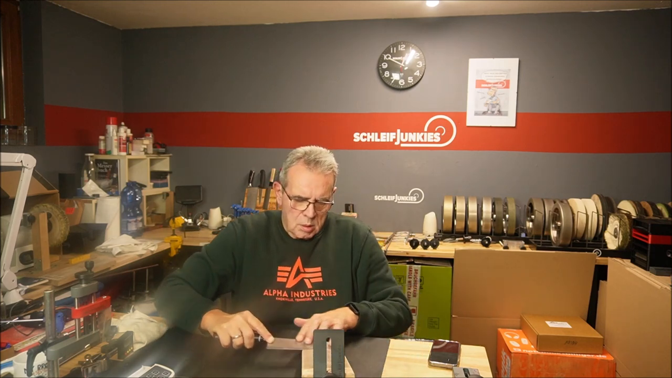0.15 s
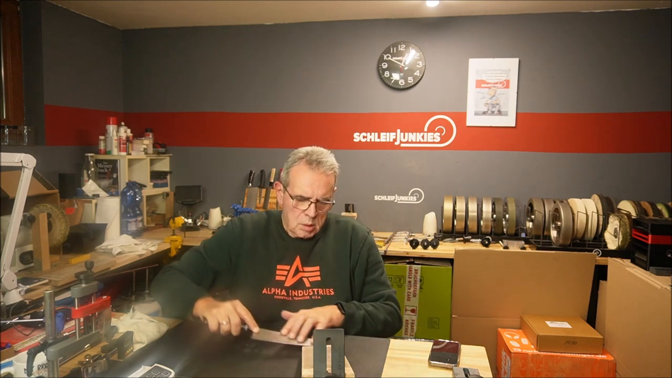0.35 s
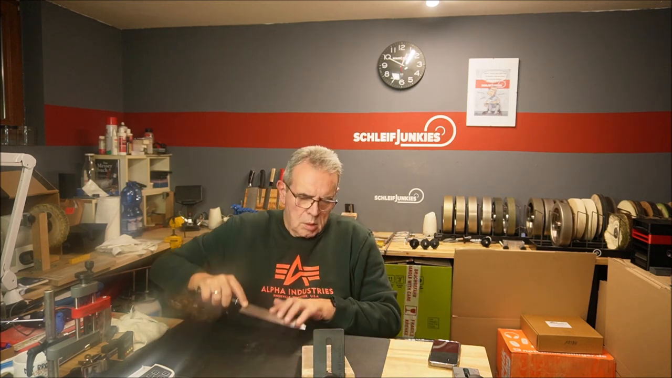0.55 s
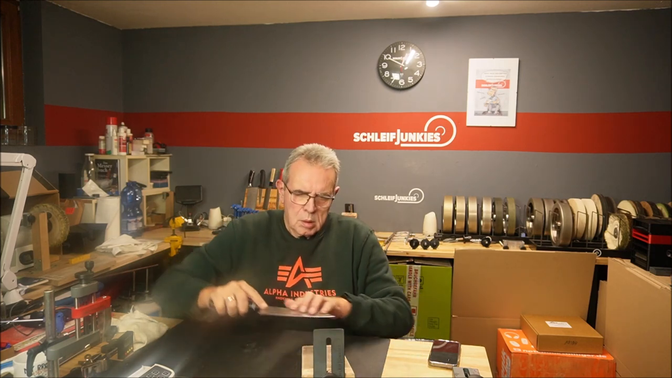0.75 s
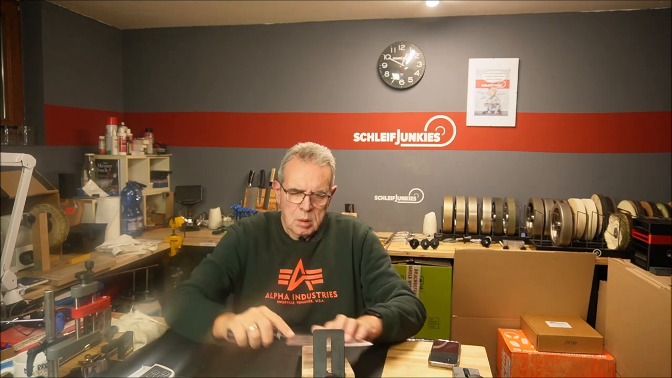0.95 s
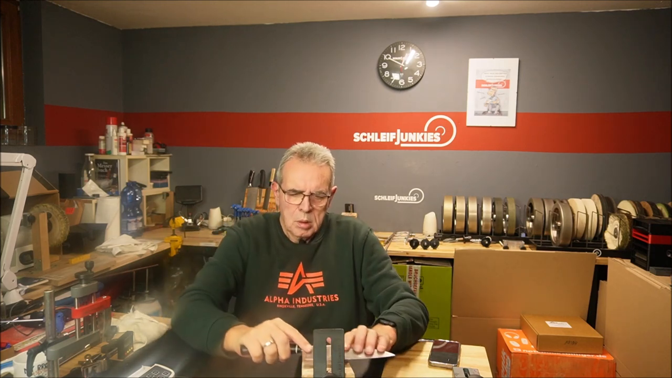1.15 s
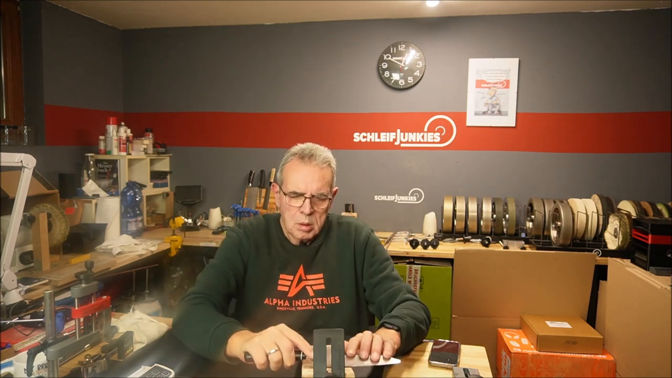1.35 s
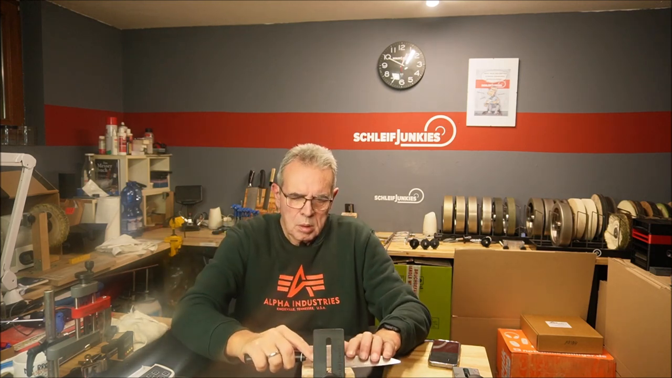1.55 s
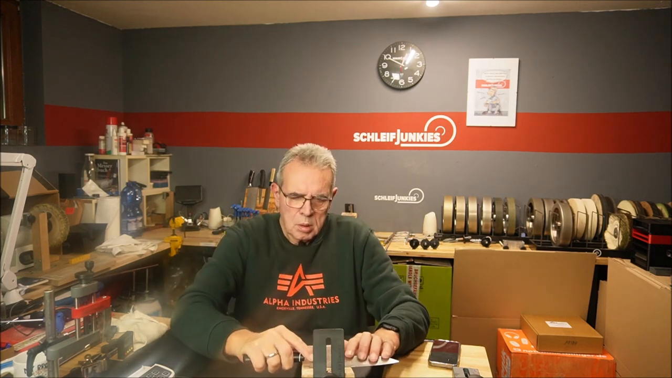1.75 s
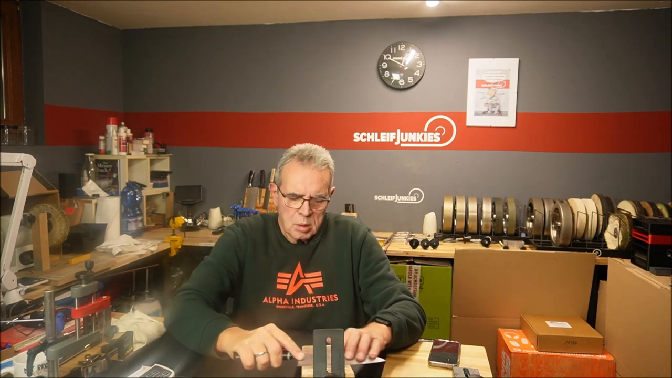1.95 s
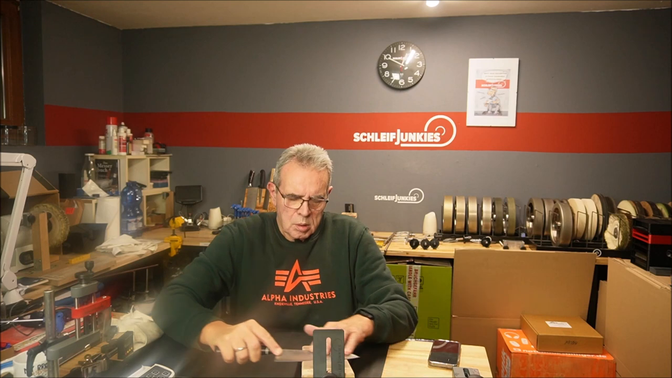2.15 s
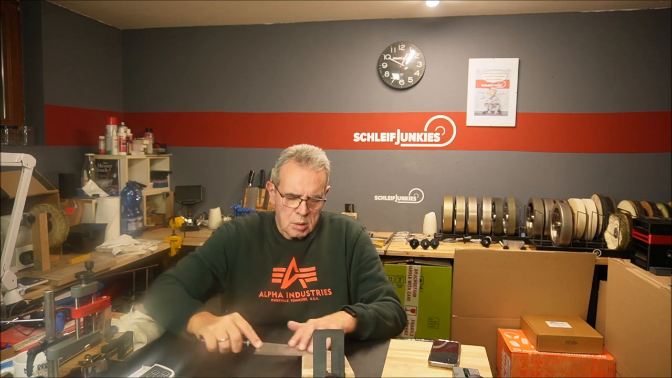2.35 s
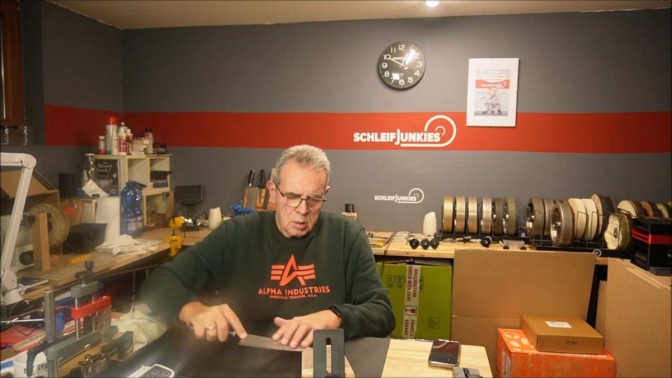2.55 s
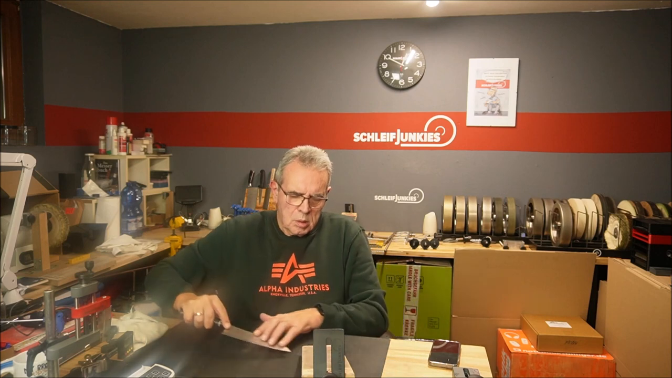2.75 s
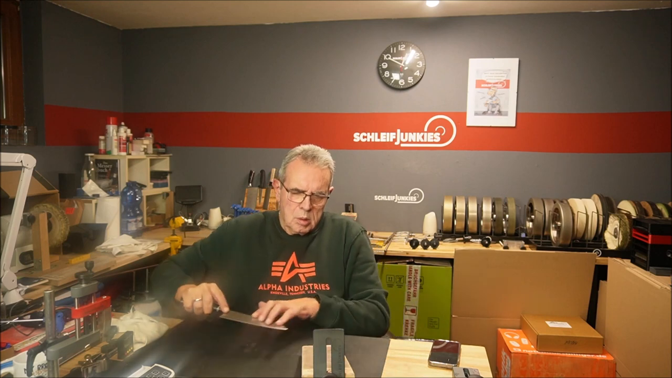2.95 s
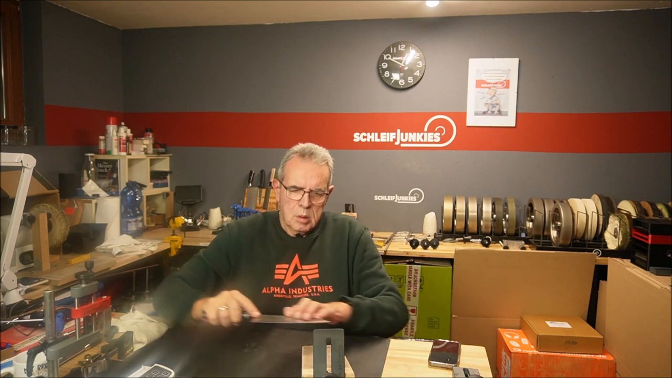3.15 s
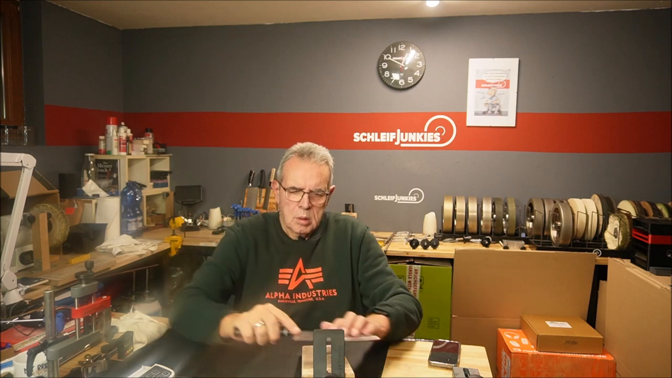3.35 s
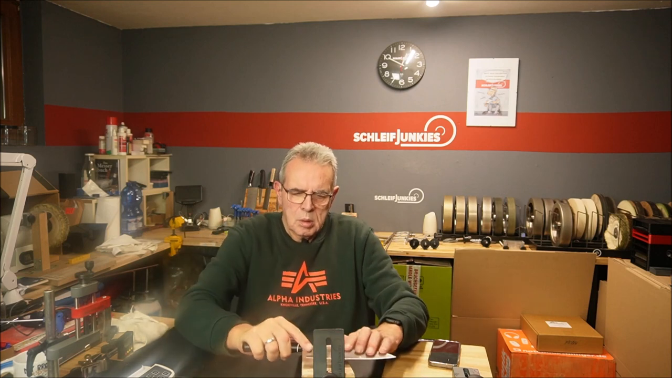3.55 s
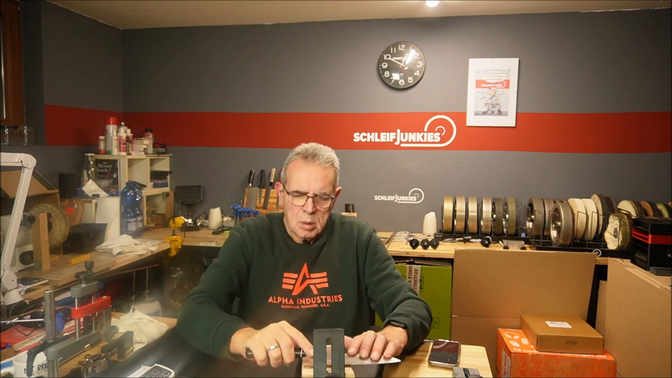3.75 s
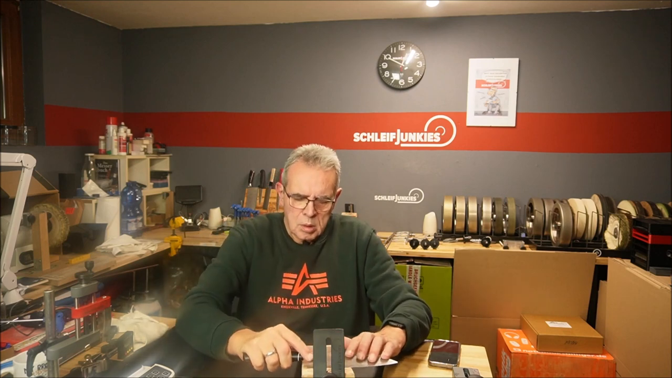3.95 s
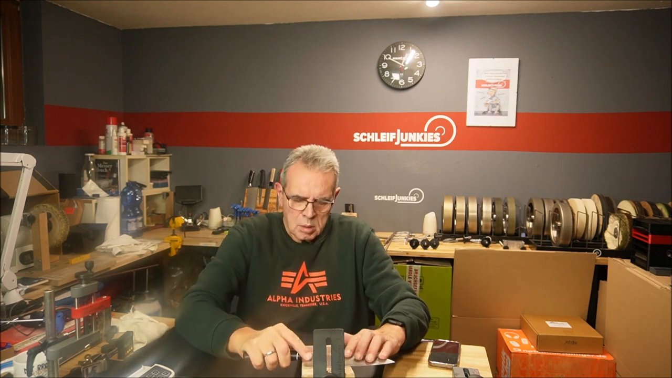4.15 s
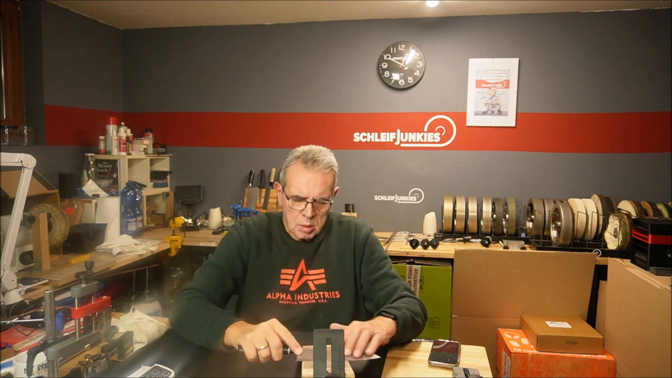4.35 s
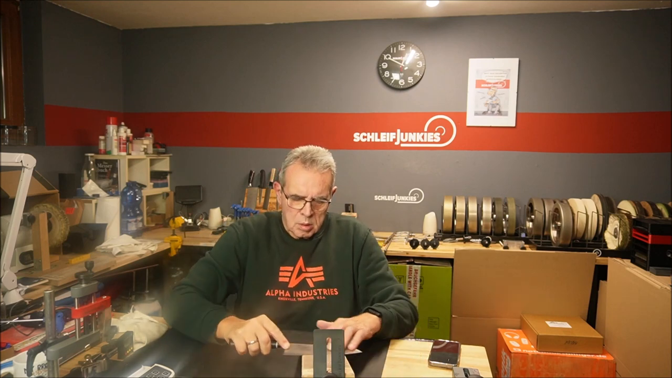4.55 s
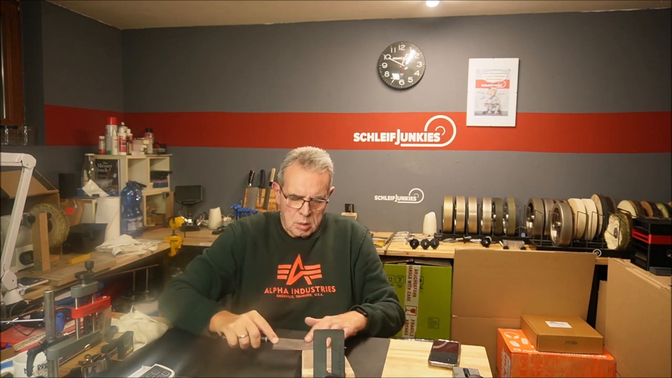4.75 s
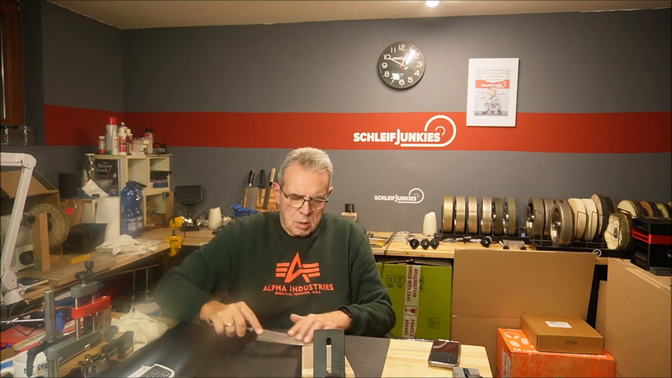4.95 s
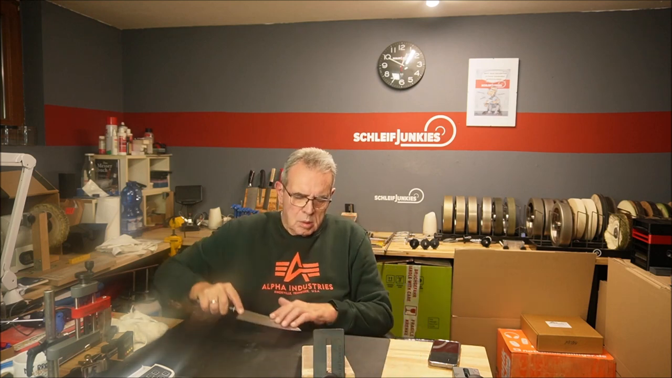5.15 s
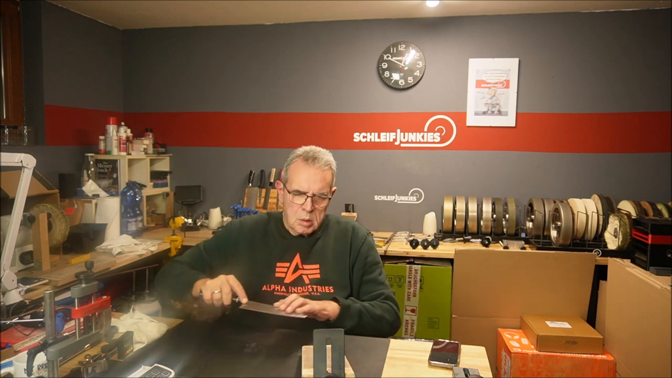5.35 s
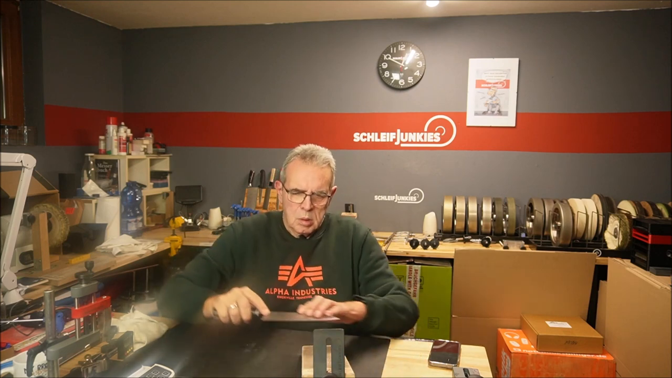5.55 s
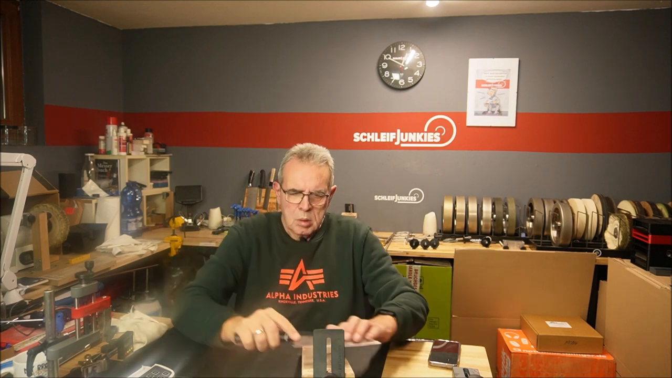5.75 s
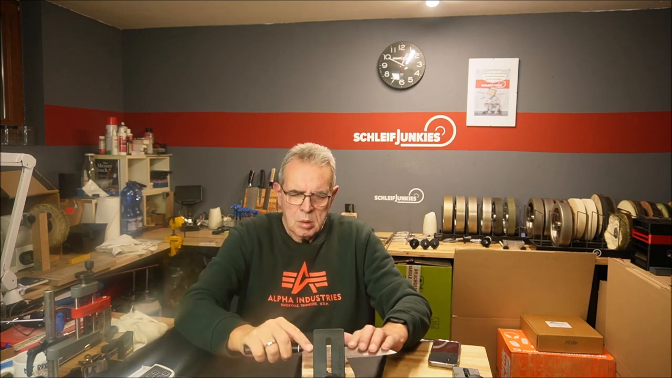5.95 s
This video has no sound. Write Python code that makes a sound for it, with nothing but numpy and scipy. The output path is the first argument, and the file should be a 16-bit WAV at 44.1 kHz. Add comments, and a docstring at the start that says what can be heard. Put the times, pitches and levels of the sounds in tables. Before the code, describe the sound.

A knife blade strops across leather in long ringing, hissing scrapes, with soft knocks as it lands, close up in a small quiet workshop.

```python
"""Knife on a leather strop

A knife is stropped on leather on a workbench, close to a stereo microphone in a small workshop.
Stick-slip friction, made of noise, drives resonances that glide as the contact goes from heel to tip:
one free length of steel shortens and the other grows, so the modes rise, fall and cross.
Decaying bench modes give soft knocks as the blade lands or leaves; short noise bursts give dry ticks.
Shaped noise gives the rustling sleeves and room tone, and a decaying noise tail gives the room."""
import sys
import numpy as np
from scipy import signal
from scipy.fft import rfft, irfft, next_fast_len
from scipy.io import wavfile
from scipy.ndimage import uniform_filter1d, map_coordinates

SR = 44100
rng = np.random.default_rng(int(sys.argv[2]) if len(sys.argv) > 2 else 0)


def int16_out(signal):
    """Quantize to a 16-bit WAV file."""
    q = np.round(np.clip(np.atleast_2d(signal).T, -1, 1) * 32767)
    wavfile.write(sys.argv[1], SR, q.astype(np.int16))


N = 269010  # length in samples


def amp(db):
    """Decibel law: 20 dB is a tenfold gain in amplitude."""
    return 10 ** (np.asarray(db) / 20)


def unit(x):
    """Normalisation: scale to a root-mean-square of 1."""
    return x / np.sqrt(np.mean(x ** 2) + 1e-20)


def along(points, hz):
    """Logarithmic frequency scale: read (Hz, value) points between their knots."""
    f, v = np.transpose(points)
    return np.interp(np.log(hz + 1), np.log(f + 1), v)


def follow(rows, where):
    """Linear interpolation: read each later column of a table along its first."""
    first, *columns = np.transpose(rows)
    return [np.interp(where, first, column) for column in columns]


def wobble(rate):
    """Band-limited random fluctuation: a smooth curve with rate knots a second, at rms 1."""
    knots = rng.standard_normal(4096)
    return unit(map_coordinates(knots, [np.arange(N) * rate / SR], order=2, mode="wrap"))


def swell(t, centre_s, half_s):
    """Gaussian envelope: a bell-shaped rise and fall of height 1."""
    return np.exp(-((t - centre_s) / half_s) ** 2)


def filtered(x, response):
    """Linear filtering: multiply the spectrum by a response of frequency."""
    n = x.shape[-1]
    padded = next_fast_len(n + 4096, True)
    hz = np.fft.rfftfreq(padded, 1 / SR)
    return irfft(rfft(x, padded) * response(hz), padded)[..., :n]


def coloured(x, spectrum):
    """Spectral shaping: give x a (Hz, dB) colour, at rms 1."""
    return unit(filtered(x, lambda hz: amp(along(spectrum, hz))))


def even(x):
    """Envelope levelling: hold the slow level at 1 and keep the fast flutter."""
    power = np.abs(uniform_filter1d(x ** 2, size=2600))
    return x / np.sqrt(power + 1e-12)


def stereo(pair, width):
    """Mid-side stereophony: the side is added on the left and subtracted on the right."""
    mid = pair[0]
    side = filtered(pair[1], lambda hz: amp(along(width, hz)))
    return np.array([mid + side, mid - side])


# contact positions (heel 0, point 1): the curve of the edge, and the furthest that a stroke reaches
BELLY, TIP = 0.57, 0.975
PULL_S = 0.06  # how quickly the hand pulls through the belly
ROLL_BACK = 0.55  # past the furthest point the contact rocks back, at this share of its speed


def contact(t, belly_s, speed, pull):
    """Kinematics: heel-to-tip travel, quicker through the belly, then a slight rock back at the tip."""
    travel = BELLY + speed * (t - belly_s) + pull * np.tanh((t - belly_s) / PULL_S)
    travel = np.maximum(travel, 0)
    return np.minimum(travel, TIP - ROLL_BACK * (travel - TIP))


# How the blade answers from heel to tip. Each row: contact position from 0 to 1,
# then deep ring, bright ring and hiss, all in dB.
RESPONSE = [(.1, -8.7, -1, -16), (.3, -11.4, -.2, -9.5), (.47, -7.3, -1.2, -12), (.6, -5, -3.9, -13),
            (.74, -8, -10.2, -16.5), (.88, -15, -14.8, -25)]
# The edge bites into the leather for a moment, or eases off. Each row: centre in seconds,
# half-width in seconds, then the change of deep ring, bright ring and hiss in dB.
BITES = [(.145, .025, -1, 5.5, -2), (2.2, .032, -2, 4, 3.5), (2.35, .046, 2.5, 11.5, 2),
         (2.574, .056, -5, -4, 1), (4.485, .023, 0, 4, 0), (4.615, .028, 7.5, -1.5, -1),
         (4.737, .035, 7, -3.5, 3), (4.82, .024, 6.5, 6.5, 1), (5.008, .012, -2, 2, 7)]
ATTACK_S, EASE_S = 0.2, 0.034  # S-curve of pressure: time to half strength, and time constant
PRESS_LEAD_S, PRESS_S = 0.026, 0.05  # last press on the tip: lead on the lift-off, and half-width
RELEASE_DB_PER_S = 1500  # the blade leaves the leather


def stroke_levels(t, position, start_s, lift_s, tip_deep_db, tip_bright_db):
    """Contact pressure sets deep ring, bright ring and hiss: it builds, bites, presses the tip, lets go."""
    attack_db = -20 * np.log10(1 + np.exp((start_s + ATTACK_S - t) / EASE_S))
    release_db = -RELEASE_DB_PER_S * np.maximum(t - lift_s, 0)
    last_press = (lift_s - PRESS_LEAD_S, PRESS_S, tip_deep_db, tip_bright_db, 0)
    bites_db = sum(np.outer(gains_db, swell(t, centre_s, half_s))
                   for centre_s, half_s, *gains_db in [*BITES, last_press])
    return np.array(follow(RESPONSE, position)) + attack_db + bites_db + release_db


def tip_echo(x, position, strength):
    """Comb filtering: waves return from the blade's far end, later as the contact travels."""
    delay_s = 0.00064 + 0.00067 * position
    echo = np.array([map_coordinates(channel, [np.arange(len(channel)) - delay_s * SR]) for channel in x])
    return unit(x + strength * echo)


def ring(friction, modes, position, tilt_db, width_hz):
    """Forced resonance: friction excites modes that glide with the contact; width_hz holds at 1 kHz."""
    out = 0
    for mode in modes:
        hz, db = follow(mode, position)
        width = width_hz * np.sqrt(hz.mean() / 1000)  # the leather damps higher modes more
        # shift the gliding mode down to 0 Hz, filter it there, and shift it back
        turn = np.exp(2j * np.pi * np.cumsum(hz) / SR)
        swing = signal.sosfilt(signal.butter(1, width / 2, fs=SR, output="sos"), friction / turn)
        swing = signal.sosfilt(signal.butter(1, width * 2, fs=SR, output="sos"), swing)
        octaves = np.log2(np.clip(hz, 1100, 3600) / 2500)
        out = out + amp(db + tilt_db * octaves) * unit((swing * turn).real)
    return out


# The strokes, with one faint brush as the blade is settled. Each row: start in seconds,
# lift-off in seconds, level in dB, extra lean toward the tip in dB, deep ring in dB, hiss in dB,
# deep and bright gain of the last press in dB, tilt of the modes at start and at lift-off in dB per octave,
# moment the belly passes in seconds, speed in blade lengths per second,
# and extra pull to either side of the belly in blade lengths.
STROKES = [ (-0.55, 0.37, -32, -1.1, 1.6, 1.2, 7, 7, -44, 12, -0.005, .88, .09),
           (1.33, 1.615, -61.5, 0, -8, 0, 0, 0, -6, -4, 1.92, .9, 0),
           (1.666, 2.656, -33, 2.6, 0.2, 1.4, -4, 4.4, -6, 8, 2.192, .78, .155),
           (3.978, 5.006, -30.2, -1.3, 0, 0.4, 9.8, 7.3, 3, -1, 4.618, 1.11, .003), ]
# Bending modes of the blade, one list of points per mode. Each point: contact position from 0 to 1,
# frequency in Hz, level in dB.
BLADE = [
    [(0, 716, -1), (.2, 860, 1.5), (.45, 1024, -22.5), (.6, 1356, 4), (.7, 1804, 8.5), (.76, 2114, 2),
     (.81, 2546, 7.5), (.88, 2680, -21)],
    [(0, 1590, -65), (.3, 1620, -19.5), (.45, 1370, -9), (.58, 1296, 14.5), (.68, 1136, 1), (.8, 937, -4.5),
     (.9, 740, -10), (1, 774, -8)],
    [(0, 2650, -4.5), (.18, 2677, 5.5), (.42, 2870, 3.5), (.55, 2330, -6.5), (.68, 2310, -6),
     (.75, 1840, 5), (.85, 1653, -7.5), (.94, 1217, 3.5), (1, 1250, 10)],
    [(0, 1750, 5), (.17, 1800, 7), (.28, 2030, -3), (.36, 2490, -2.5), (.43, 3030, 10.5), (.48, 2970, 2.5),
     (.56, 3430, -1), (.66, 3576, -10.5), (.83, 3520, -4), (.9, 3560, -5)],
    [(0, 3000, -16), (.2, 3177, 7), (.35, 3230, 3.5), (.5, 3500, -1.5), (.6, 3360, 0), (.74, 3220, -6),
     (.84, 3290, 6), (.9, 3150, -10.5), (1, 3030, -3)],
    [(0, 3430, -29), (.25, 3520, 3), (.45, 3910, -11.5), (.7, 4140, -10), (.88, 3970, -5), (.97, 3260, -10),
     (1, 3530, 3)],
    [(0, 2350, -8), (.25, 2330, 6), (.5, 2250, -30.5), (.88, 2650, -10.5), (.96, 2550, 2), (1, 2550, 8)],
    [(.55, 3030, -41), (.8, 2520, -4), (.89, 2430, -3.5), (.94, 1840, 2), (1, 2050, 3)],
    [(.75, 4030, -46), (.85, 4400, -10), (.9, 4520, -8.5), (.94, 4500, -12), (1, 4380, -17)],
]
# High, crowded modes of the edge, one list of points per mode. Each point: contact position from 0 to 1,
# frequency in Hz, level in dB.
EDGE = [
    [(0, 6270, 1), (.3, 6850, -3.5), (.55, 7300, -3), (.75, 7560, -2), (.9, 6080, -8.5), (1, 5700, -13)],
    [(0, 7300, -1), (.35, 7700, -3.5), (.55, 7800, -1), (.7, 7000, -4), (.85, 8300, 7.5), (1, 8150, -25)],
    [(0, 7600, -9), (.35, 8200, 0), (.55, 8400, -11), (.75, 8730, 6.5), (.88, 9260, -10), (1, 9200, -6)],
    [(0, 10000, -21), (.5, 9400, -8), (.8, 10300, -6), (1, 11000, -19)],
]
# Rub between the modes. Each row: frequency in Hz, level in dB.
SCRAPE = [(150, -60), (450, -12), (700, -10), (1050, -13), (1400, -4.5), (2150, -11.5), (3100, -7),
          (3900, -8), (5200, -29), (6500, -49)]
# Hiss of the leather fibres. Each row: frequency in Hz, level in dB.
HISS = [(600, -70), (3500, -24), (5000, -35), (5800, -19), (6800, 8.5), (8000, 9), (10000, -4),
        (11200, -8.5), (12500, -21), (14500, -15), (15700, -32)]
# Rumble of the rubbed strop. Each row: frequency in Hz, level in dB.
STROP = [(30, -36), (70, -14), (130, -15.5), (280, -7), (385, 4.8), (500, -7), (650, -3.5), (800, -1.5),
         (1100, -27)]
# Fizz of the finest fibres. Each row: frequency in Hz, level in dB.
FIZZ = [(5000, -27), (9500, 3), (11500, 0), (12800, -10), (15000, -2.5)]
FIZZ_LEAN = 0.9  # leaning on the tip tears more fine fibres: dB of fizz per dB of lean
PATCH_DB, PATCH_RATE = 0.6, 24  # uneven nap of the leather: depth in the hiss, and knots per second


def strokes():
    """Stick-slip friction: catching fibres ring the blade, hiss, and rumble in the strop."""
    out = np.zeros((2, N))
    grip = amp(1.13 * wobble(35) + 0.49 * wobble(420))
    slips = grip * rng.standard_normal((3, 2, N))
    nap_db = PATCH_DB * wobble(PATCH_RATE)
    for (start_s, lift_s, db, tip_lean_db, deep_gain_db, hiss_gain_db, tip_deep_db, tip_bright_db,
         tilt_start_db, tilt_end_db, belly_s, speed, pull) in STROKES:
        span = np.arange(max(0, round(start_s * SR)), min(N, round(lift_s * SR) + SR // 16))
        t = span / SR
        position = contact(t, belly_s, speed, pull)
        lean_db = tip_lean_db * np.clip((position - BELLY) / (.85 - BELLY), 0, 1)
        levels_db = stroke_levels(t, position, start_s, lift_s, tip_deep_db, tip_bright_db)
        deep_db, bright_db, hiss_db = db + lean_db + levels_db
        # a steeper blade favours the higher modes
        tilt_db = np.interp(t, [start_s, lift_s], [tilt_start_db, tilt_end_db])

        catch, rub, fibres = slips[..., span]
        rub = tip_echo(rub, position, strength=0.48)
        fibres = tip_echo(fibres, position, strength=0.25)

        steel = ring(catch, BLADE, position, tilt_db, width_hz=71.5) + amp(-7) * coloured(rub, SCRAPE)
        low = filtered(steel, lambda hz: 1 / (1 + (hz / 2100) ** 16))
        blade = amp(deep_db + deep_gain_db) * even(low) + amp(bright_db) * even(steel - low)

        edge_ring = ring(catch, EDGE, position, tilt_db=-3.5, width_hz=86)
        edge = even(amp(3.5) * edge_ring + coloured(fibres, HISS))
        edge = amp(hiss_db + hiss_gain_db + nap_db[span]) * edge

        # rumble and fizz follow the pressure less steeply than the steel does
        pressure_db = np.maximum(deep_db, bright_db)
        rumble = amp(-37.5 + 0.42 * pressure_db) * coloured(catch, STROP)
        fizz = amp(-52.8 + 0.38 * pressure_db + FIZZ_LEAN * lean_db) * coloured(fibres, FIZZ)
        out[:, span] += blade + edge + rumble + fizz
    return out


# Sleeves shift as the hands lift and swing back. Each row: centre in seconds, half-width in seconds,
# level in dB.
SLEEVE = [(.62, .05, -56.5), (1.03, .16, -62), (2.86, .06, -57), (3.4, .2, -63.5), (5.3, .07, -60.5),
          (5.87, .16, -62.5)]
# Colour of the cloth. Each row: frequency in Hz, level in dB.
CLOTH = [(40, -3), (100, 3), (300, 0), (600, -2.5), (1500, -11.5), (3000, -9), (6000, -20), (15000, -27)]
# Colour of the room tone. Each row: frequency in Hz, level in dB.
FLOOR = [(12, -33), (20, -19), (38, 3.5), (65, -12.5), (95, 5.5), (126, -6), (291, 0), (430, -11.5),
         (494, -9), (672, -13), (794, -11), (1390, -12.5), (4600, -15.5), (15700, -24.5)]
# Width of the background. Each row: frequency in Hz, side over mid in dB.
FLOOR_SIDE = [(60, -10), (180, -10.5), (550, -9), (1650, -7), (4970, -5), (15000, -3)]
FLOOR_DB = -61
SLEEVE_REST_DB = -69  # the arms are never quite still
SLEEVE_DRAW_DB, SLEEVE_DRAW_S = -61, 0.4  # the drawing arm around the belly: level and half-width
SLEEVE_STOP_DB, SLEEVE_STOP_S = -57, 0.17  # the arm stops at lift-off: level and half-width


def background():
    """Broadband noise: steady room tone, and sleeves rustling in each full stroke and between strokes."""
    t = np.arange(N) / SR
    moves = list(SLEEVE)
    for _, lift_s, *_, belly_s, _, _ in STROKES:
        if belly_s < lift_s:  # a full stroke passes the belly
            moves += [(belly_s, SLEEVE_DRAW_S, SLEEVE_DRAW_DB), (lift_s, SLEEVE_STOP_S, SLEEVE_STOP_DB)]
    # independent rustles add in power
    moving_power = sum((amp(db) * swell(t, centre_s, half_s)) ** 2 for centre_s, half_s, db in moves)
    motion = np.sqrt(amp(SLEEVE_REST_DB) ** 2 + moving_power)
    sleeves = motion * amp(0.79 * wobble(53)) * coloured(rng.standard_normal((2, N)), CLOTH)
    tone = amp(FLOOR_DB) * coloured(rng.standard_normal((2, N)), FLOOR)
    return stereo(sleeves + tone, FLOOR_SIDE)


# The blade lands on or leaves the strop. Each row: time in seconds, knock in dB, hardness in dB, thud in dB.
KNOCKS = [(0.377, -51, 3, -3), (1.3816, -28.5, 0.7, -0.5), (2.66, -51.5, -1, 8), (3.823, -28.5, -5, 2),
          (3.874, -49.5, 0.5, 4), (5.007, -44, -1, 8)]
# Modes of strop and bench. Each row: frequency in Hz, level in dB, time to decay by 60 dB in seconds.
BENCH = [(118, -11, 0.14), (178, -7, 0.078), (195, -13.5, 0.09), (293, -14, 0.29), (367.8, -1.5, 0.094),
         (376.4, -8.5, 0.16), (624, -1, 0.071), (667, 4.5, 0.039), (760, 1.5, 0.072), (807, -16, 0.11),
         (1440, -14, .05), (1860, -9, 0.025), (2530, -8, 0.018), (3350, -18, 0.046)]
# The soft slap of steel on leather. Each row: frequency in Hz, level in dB.
PUFF = [(100, 1), (700, 4.5), (1200, -8), (3000, -11), (5000, -38.5), (9000, -70)]


def knocks():
    """Impact excitation: hard contacts reach the bench's high modes, heavy ones its low modes."""
    out = np.zeros(N + SR)
    t = np.arange(SR // 2) / SR
    for start_s, db, hard_db, thud_db in KNOCKS:
        modes = 0
        for hz, mode_db, t60 in BENCH:
            colour_db = hard_db * (hz > 500) + 2 * hard_db * (hz > 3000) + thud_db * (hz < 250)
            level_db = mode_db + rng.normal(0, 0.7) + colour_db
            modes = modes + amp(level_db - 60 * t / t60) * np.sin(2 * np.pi * hz * t)
        slap = amp(-7 + hard_db - 60 * t / 0.042) * coloured(rng.standard_normal(len(t)), PUFF)
        blow = (modes + slap) * (1 - np.exp(-t / 0.002))  # a soft onset
        out[round(start_s * SR):][:len(t)] += amp(db) * blow
    # the bench radiates no deep bass
    out = signal.sosfilt(signal.butter(3, 85, "high", fs=SR, output="sos"), out[:N])
    slope = np.std(out) * unit(np.gradient(out))
    return np.array([out, slope])  # mid hears the pressure, side its slope


# Small ticks of the knife in the hand. Each row: time in seconds, relative level in dB,
# body (gain of the lows) in dB.
TICKS = [(.451, -32.5, 5), (.515, -39, -13), (5.18, -39, -16), (5.206, -30.5, -9)]
# Colour of a tick. Each row: frequency in Hz, level in dB.
TICK = [(200, -6), (1200, 0), (3000, 0), (5500, -12), (8000, -14), (10500, -10), (15000, -22)]


def ticks():
    """Impulsive noise: bursts that decay within milliseconds as the knife is turned in the fingers."""
    out = np.zeros((2, N + SR))
    t = np.arange(SR // 20) / SR
    for start_s, db, body_db in TICKS:
        snap = coloured(rng.standard_normal((2, len(t))), TICK) * amp(db - 6 - 60 * t / 0.0081)
        snap = filtered(snap, lambda hz: amp(body_db / (1 + (hz / 1800) ** 4)))
        out[:, round(start_s * SR):][:, :len(t)] += snap
    return out[:, :N]


# The freed blade sings on faintly after lift-off. Each row: time in seconds, level in dB.
LIFTS = [(5.014, -63)]


def free_ring():
    """Free vibration: off the damping leather, one mode of the blade rings on at a fixed pitch."""
    out = np.zeros((2, N + SR))
    t = np.arange(SR // 2) / SR
    for start_s, db in LIFTS:
        tone = amp(db - 60 * t / 1.0) * np.sin(2 * np.pi * 1295 * t)
        out[:, round(start_s * SR):][:, :len(t)] += tone
    return out[:, :N]


# Decay of the room. Each row: frequency in Hz, time to decay by 60 dB in seconds.
ROOM = [(100, 0.33), (400, 0.28), (2000, 0.18), (12000, 0.095)]


def workshop(x):
    """Reverberation: convolution with a short noise tail whose treble dies first."""
    hz, t, noise = signal.stft(rng.standard_normal((2, SR // 2)), SR, nperseg=256)
    decay = amp(-60 * t / along(ROOM, hz)[:, None])
    build_up = 1 - np.exp(-t / 0.011)
    tail = signal.istft(noise * decay * build_up, SR, nperseg=256)[1]
    return signal.fftconvolve(x, tail / np.linalg.norm(tail[0]), axes=1)[:, :N]


# Width of the near sounds. Each row: frequency in Hz, side over mid in dB.
WIDTH = [(100, -27), (400, -21), (1200, -40), (2400, -9), (3600, -19.5), (4500, 3), (5500, 17), (6500, 6.5),
         (8000, -40), (10000, -3.5), (12500, 9.5), (15000, -5)]
# The near sounds lean a little to one side. Each row: frequency in Hz, left minus right in dB.
LEAN = [(100, 2), (1200, -0.5), (2600, -1), (4500, -1), (6500, -1), (8500, 2), (15000, -1)]


def scene():
    """Superposition: knife and bench just in front of the microphone, the room behind them."""
    knife = strokes() + free_ring() + ticks()
    bench = knocks()
    room = workshop(amp(-15.5) * knife + amp(-14.5) * bench)
    near = stereo(knife + bench + room, WIDTH)
    sides = np.array([[.5], [-.5]])  # left and right each take half of a difference
    lag_s = 1.5e-5  # the right capsule is slightly nearer
    near = filtered(near, lambda hz: amp(sides * along(LEAN, hz)) * np.exp(-2j * np.pi * hz * sides * lag_s))
    return near + amp(sides * 0.23) * background()


TOP_HZ = 15820


def record(dry):
    """Band limitation: nothing is kept above the top frequency."""
    return filtered(dry, lambda hz: hz < TOP_HZ)


dry = scene()
out = record(dry)
int16_out(out)
```